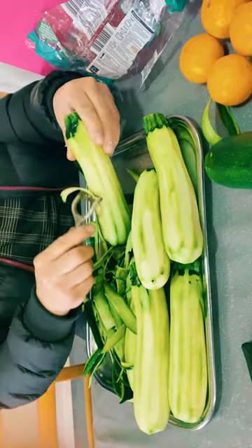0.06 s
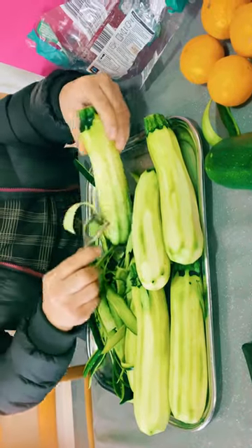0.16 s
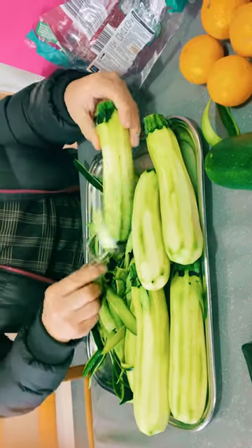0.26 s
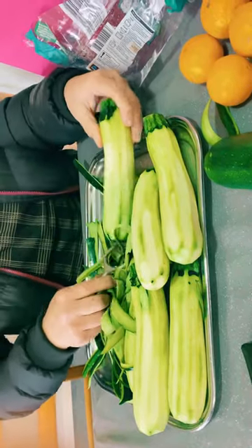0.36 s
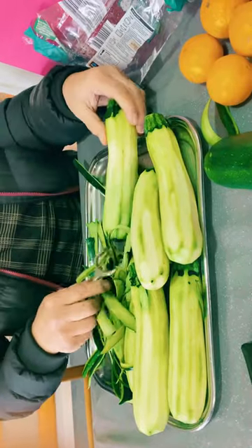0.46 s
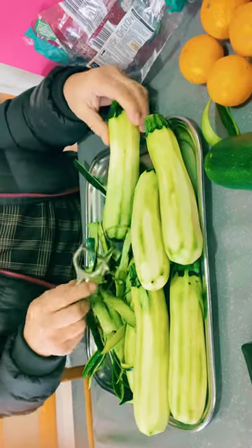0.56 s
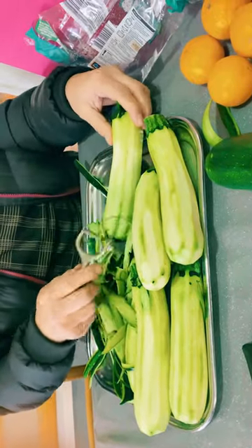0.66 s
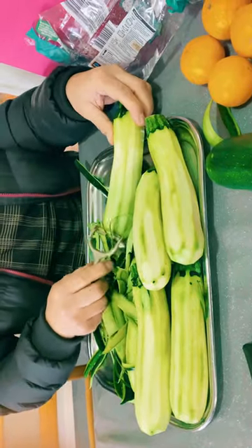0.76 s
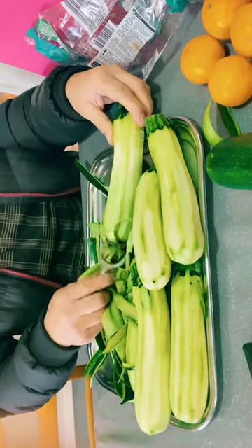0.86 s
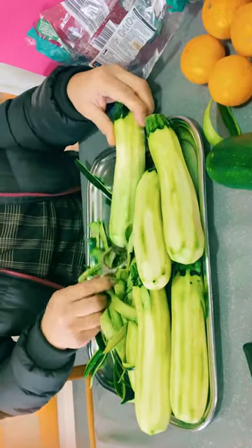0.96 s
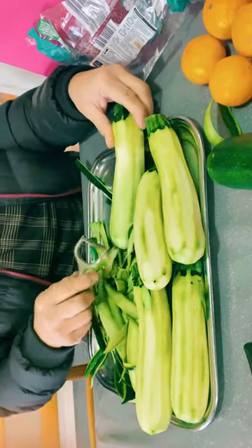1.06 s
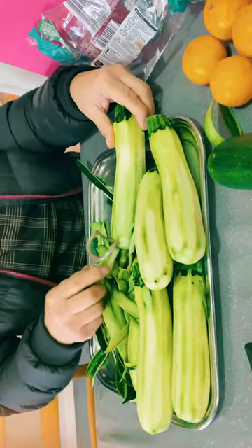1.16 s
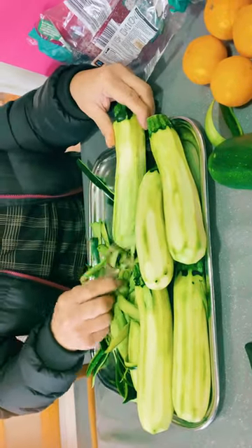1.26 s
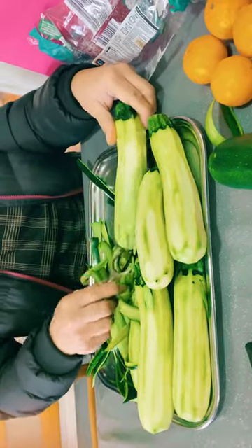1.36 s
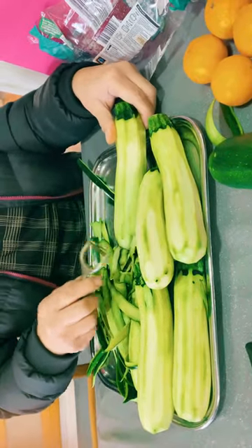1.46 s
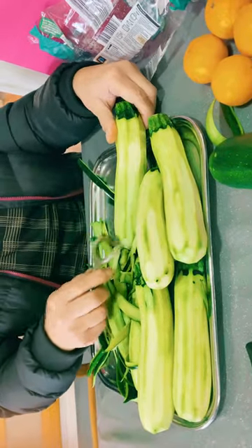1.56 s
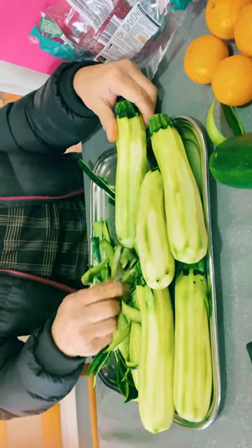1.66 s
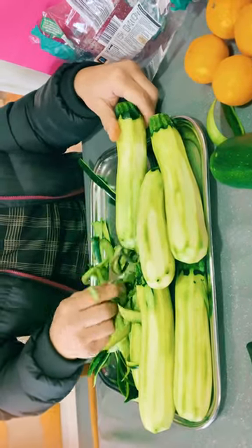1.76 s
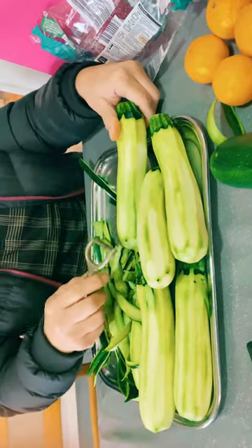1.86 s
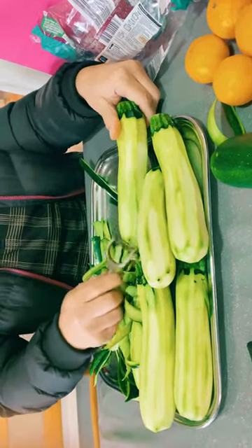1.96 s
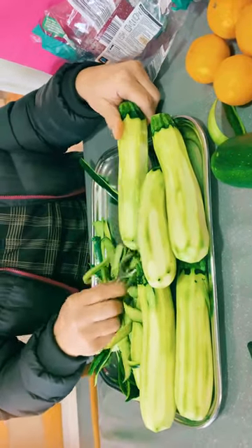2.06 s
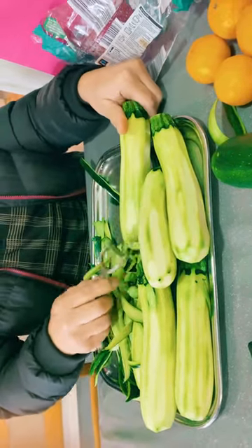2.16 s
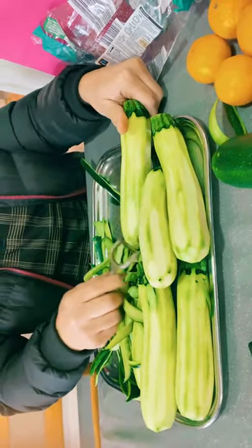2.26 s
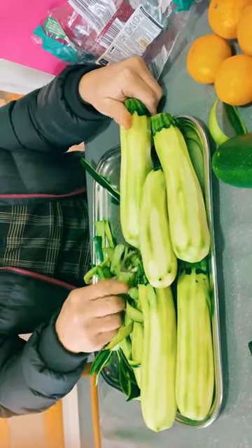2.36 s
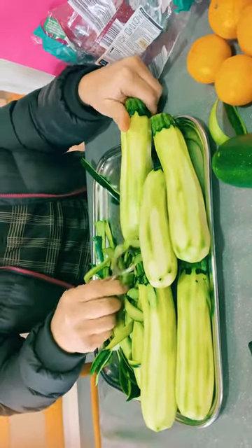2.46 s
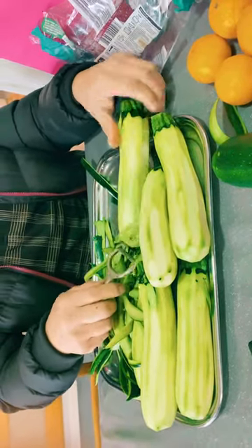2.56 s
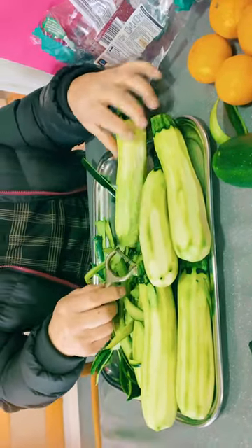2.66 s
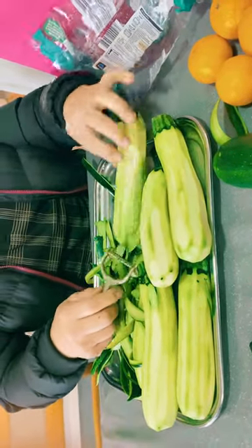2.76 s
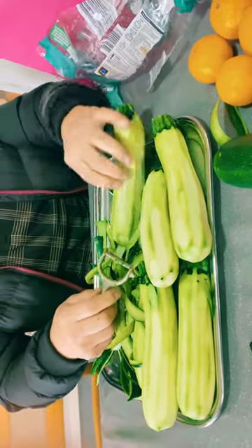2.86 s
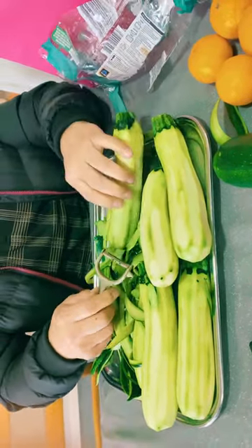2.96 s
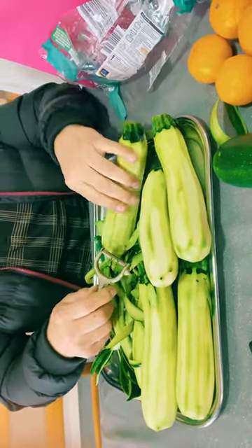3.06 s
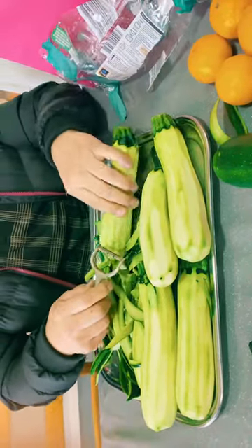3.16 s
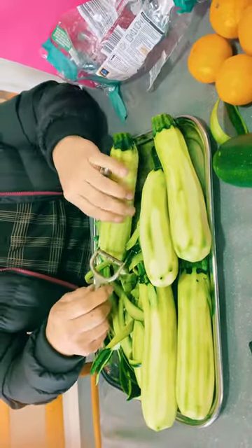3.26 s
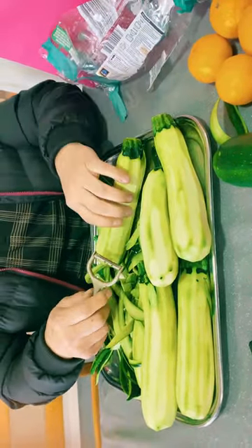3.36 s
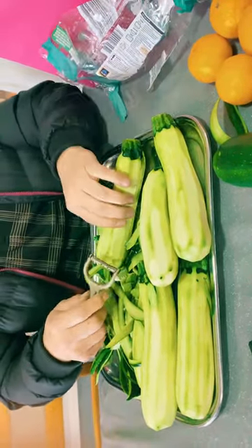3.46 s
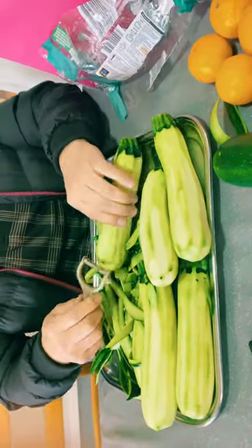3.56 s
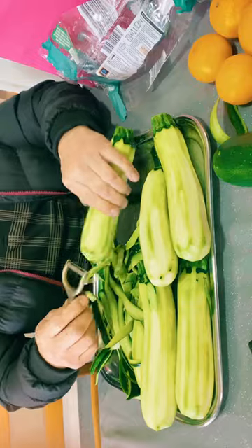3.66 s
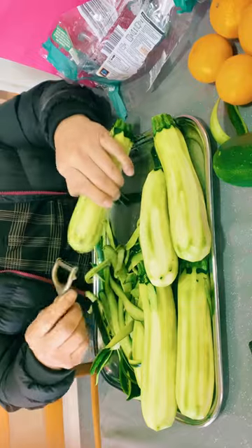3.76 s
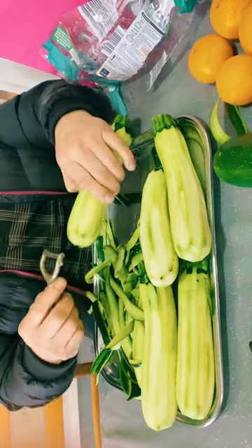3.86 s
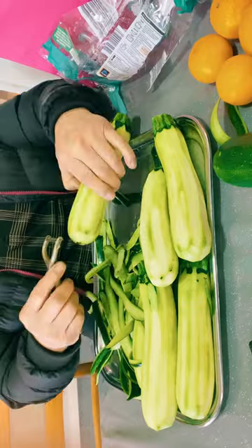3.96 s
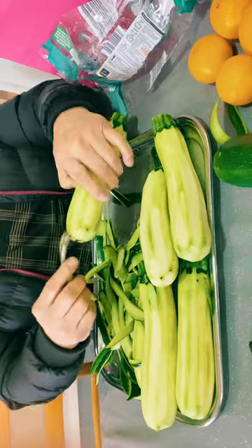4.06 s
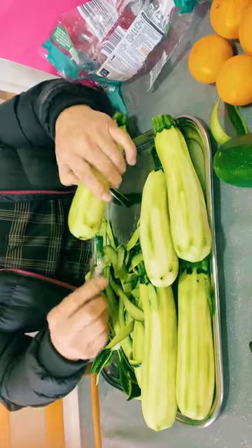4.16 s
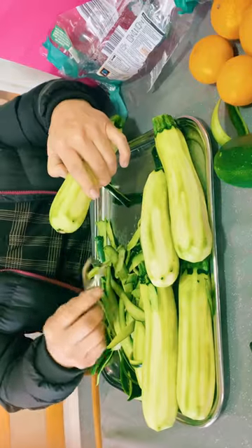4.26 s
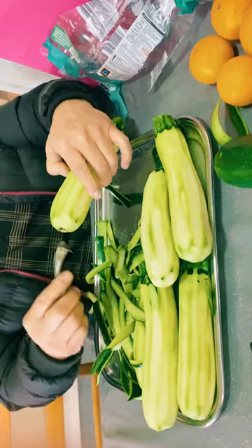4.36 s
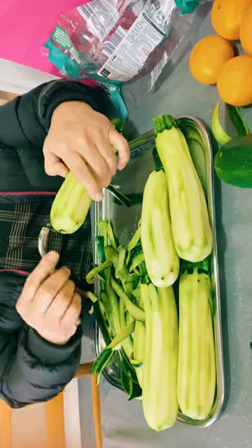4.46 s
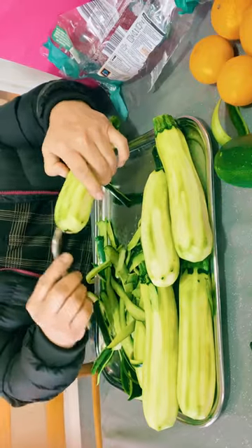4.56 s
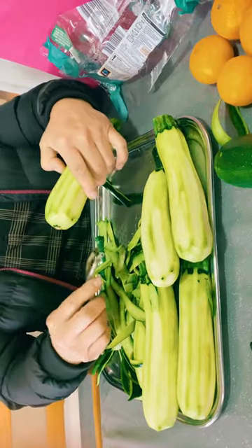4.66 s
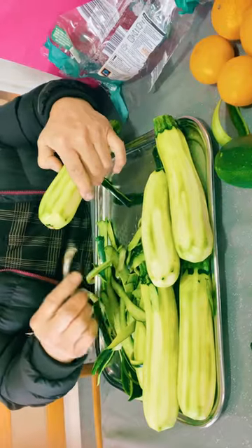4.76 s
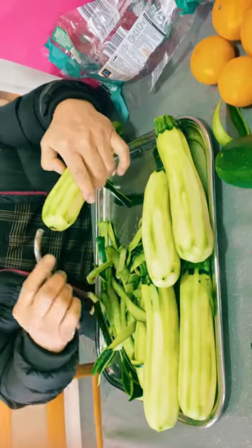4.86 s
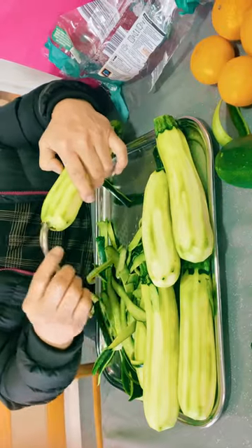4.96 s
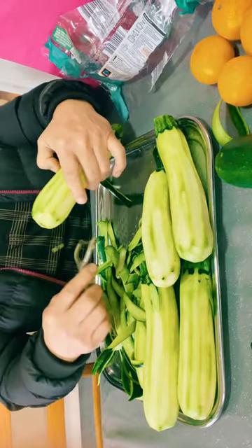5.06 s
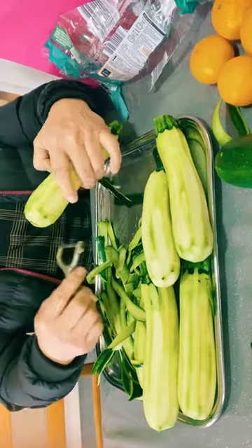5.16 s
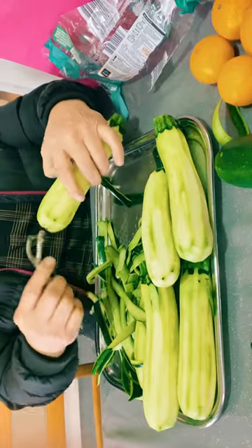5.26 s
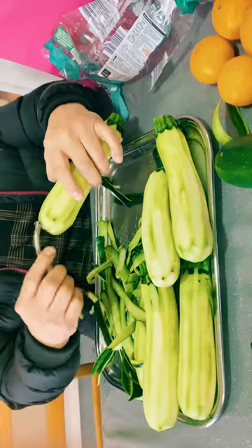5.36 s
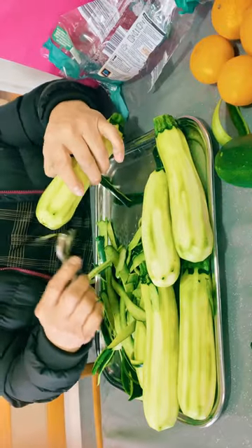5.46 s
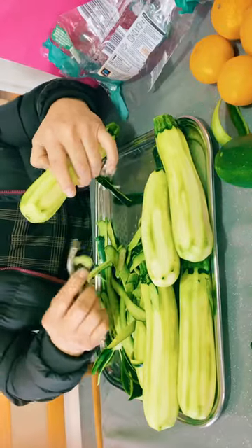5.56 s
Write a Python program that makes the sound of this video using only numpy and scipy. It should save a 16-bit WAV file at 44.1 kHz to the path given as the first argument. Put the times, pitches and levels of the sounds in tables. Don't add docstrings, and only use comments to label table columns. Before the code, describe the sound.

A close stereo pickup in a small, hard kitchen, with faint hiss and a steady low appliance hum. It opens with a soft, fluttering slide of wet skin on steel and sleeve rustle. From about 0.37 s a peeler works over marrows on a metal tray: crisp gritty bites, brief blade rasp, and hard clacks with short tray ring and counter thump near 0.38, 0.9, 1.3, 1.7, 2.05 and 2.3 s, the last cluster among the loudest. Lighter ticks and gliding scrapes fill the gaps, and around 1.6 s a bright snap rings thinly. From 2.5 to 4 s it is nearly quiet: tiny ticks, a hissy cloth flick near 2.85 s, soft low bumps around 3.6 s. From 4.03 s, thin bright snips come in small groups near 4.05, 4.2, 4.5, 4.95, 5.1, 5.4 and 5.55 s, dry and without tray ring, with gentle sleeve swishes between.

```python
import sys
import numpy as np
from scipy import signal
from scipy.fft import rfft, irfft, next_fast_len
from scipy.io import wavfile

SR = 44100
rng = np.random.default_rng(int(sys.argv[2]) if len(sys.argv) > 2 else 0)


def natural_amplitude(level_db):
    exponent = np.asarray(level_db, float) / 20
    return 10 ** exponent


def file_out(sig):
    cols = np.atleast_2d(sig).T
    lim = np.clip(cols, -1, 1)
    pcm = np.round(lim * 32767).astype(np.int16)
    wavfile.write(sys.argv[1], SR, pcm)


N = 247842


def unit(x):
    return x / np.sqrt(np.mean(x ** 2) + 1e-20)


def at_hz(points, hz):
    f, value = np.transpose(points)
    return np.interp(np.log(hz + 1), np.log(f + 1), value)


def drift(rate_hz):
    step = 40
    r = np.exp(-2 * step * np.pi * rate_hz / SR)
    white = rng.standard_normal(N // step + 2002)
    slow = signal.lfilter([1], [1, -2 * r, r * r], white)[2000:]
    return np.interp(np.arange(N) / step, np.arange(len(slow)), unit(slow))


def resonance(x, hz, width, order=1):
    r = np.exp(-np.pi * max(width, 1) / SR)
    peak = [(1 - r * r) / 2, 0, (r * r - 1) / 2, 1, -2 * r * np.cos(2 * np.pi * hz / SR), r * r]
    return signal.sosfilt([peak] * order, x + 1e-18)


def grains(rate_hz, spread_db):
    sizes = natural_amplitude(spread_db * np.minimum(rng.exponential(1, N), 3))
    sizes = sizes * rng.choice([-1, 1], N)
    return unit(sizes * (rng.random(N) < rate_hz / SR))


def struck(body, events, column, gain_db, drive, rise_s, stretch, order=1, hold=1):
    times, level_db, lengths = np.array(events)[:, [0, column, -1]].T
    luck = rng.standard_normal((len(times), len(body)))
    t = np.arange(int(SR * min(0.25, 0.09 * stretch))) / SR
    fade_s = stretch * np.clip(lengths, 0.001, 0.06)[:, None]
    bursts = (1 - np.exp(-t / rise_s)) * np.exp(-(t / fade_s) ** hold)
    starts = (times * SR).astype(int)
    drive = np.r_[drive, drive[:len(t)]]
    shakes = []
    for at, burst in zip(starts, bursts):
        shake = burst * drive[at:at + len(t)]
        shakes.append(shake * np.linalg.norm(burst) / np.linalg.norm(shake))
    out = np.zeros(N)
    for k, (hz, width, db) in enumerate(body):
        force = np.zeros(N + SR)
        gains = natural_amplitude(level_db + gain_db + db + 1.1 * luck[:, k])
        for at, shake, gain in zip(starts, shakes, gains):
            force[at:at + len(t)] += gain * shake
        out += (-1) ** k * resonance(force[:N], hz, width, order)
    return out


def rubbed(body, level_db, drive, flicker_db, flicker_rate):
    total = 0
    for k, (hz, width, db) in enumerate(body):
        flicker = natural_amplitude(db + flicker_db * drift(flicker_rate))
        total = total + flicker * resonance(drive, hz, width) * (-1) ** k
    return natural_amplitude(level_db) * unit(total)


def bands(white, spectrum):
    edges = 25 * 2 ** np.arange(0, 9.6, 0.5)
    for k, (low, high) in enumerate(zip(edges, edges[1:])):
        hz = np.sqrt(low * high)
        band = signal.butter(2, [low, high], "band", fs=SR, output="sos")
        yield hz, natural_amplitude(at_hz(spectrum, hz)) * signal.sosfilt(band, white[k % 2])


# (t/s, blade level/dB, edge
# level/dB, tray level/dB, burst length/s)
KNOCKS = [(0.377, -14, -14, -15, 0.0027), (0.384, -27.5, -36, -27, 0.0029),
          (0.727, -55.5, -37, -34.5, 0.003), (0.893, -33, -29.5, -33, 0.015),
          (0.904, -10.5, -10.5, -10, 0.0031), (0.9157, -20.5, -29, -24.5, 0.0027),
          (1.3054, -17, -13.5, -16.5, 0.0032), (1.312, -28, -27, -20, 0.0034),
          (1.692, -47, -39, -31, 0.0029), (1.693, -25.5, -18.5, -59, 0.002),
          (2.042, -32, -23, -18.5, 0.0017), (2.052, -53, -43, -26.5, 0.003),
          (2.2833, -36.5, -33, -45, 0.0026), (2.295, -49.5, -45.5, -47.5, 0.023),
          (2.321, -15, -12.5, -10.5, 0.0027), (2.322, -13, -30, -21, 0.0026),
          (2.3279, -20, -29.5, -12, 0.0025), (5.0207, -39.5, -36.5, -66, 0.0017),
          (5.035, -60, -48, -75, 0.002), (5.402, -42, -31, -63, 0.00083)]


def knocks():
    drag_db = -16.5
    return [(s, blade, edge, tray, blade + drag_db, length) for s, blade, edge, tray, length in KNOCKS]


# (t/s, blade level/dB, edge level/dB, drag level/dB)
RESTING_BITES = [(0.355, -50, -60, -68), (0.365, -32.5, -28.5, -48), (0.565, -59.5, -59.5, -73),
                 (0.7198, -27, -23, -38.5), (1.025, -41, -34, -68), (1.119, -41, -46.5, -56.5),
                 (1.1932, -32, -24, -47.5), (1.196, -32.5, -30.5, -51), (1.277, -44.5, -47, -72),
                 (1.524, -42.5, -44, -61), (1.574, -48, -57, -63), (1.5972, -23.5, -16, -103.5),
                 (1.6065, -36.5, -28, -59.5), (1.613, -50, -39.5, -41.5), (1.7874, -38.5, -31, -55),
                 (1.908, -49, -51, -92), (1.954, -30, -31, -50), (2.029, -36.5, -39, -62),
                 (2.131, -46.5, -41.5, -55), (2.243, -48.5, -49, -77.5), (2.492, -66, -48, -53),
                 (2.551, -56, -76, -79), (2.744, -73, -53, -93), (2.757, -70.5, -63.5, -89),
                 (2.77, -72.5, -58, -90), (2.796, -69, -49.5, -88)]
# (t/s, blade level/dB, edge level/dB, drag level/dB)
HELD_BITES = [(4.033, -32, -23.5, -51), (4.048, -28, -25.5, -47.5), (4.055, -30, -24.5, -50.5),
              (4.168, -53, -54, -78), (4.2065, -39, -27, -51.5), (4.5078, -32.5, -36.5, -57),
              (4.518, -42, -44, -64), (4.5262, -30.5, -34.5, -51), (4.624, -45.5, -47, -53.5),
              (4.662, -42, -31.5, -57), (4.918, -51, -54.5, -71), (4.9475, -33, -33, -56.5),
              (4.9555, -36, -50, -54), (5.025, -56, -57, -56.5), (5.091, -35.5, -32.5, -54),
              (5.312, -58, -60.5, -77.5), (5.3715, -30.5, -30, -49), (5.389, -27.5, -29, -54),
              (5.394, -34, -25, -47), (5.489, -43, -49, -66), (5.5515, -38, -35, -58)]


def bites():
    firm_s, firm_db, soft_stretch = 0.0051, -38, 0.13
    repeat_s, repeat_db = 0.0079, -13
    rows = []
    for table, passed_db in ((RESTING_BITES, -16.5), (HELD_BITES, -29)):
        for s, blade, edge, drag in table:
            length = firm_s * natural_amplitude(soft_stretch * (firm_db - max(blade, edge)))
            bite = np.array([blade, edge, blade + passed_db])
            rows.append((s, *bite, drag, length))
            rows.append((s + repeat_s, *(bite + repeat_db), drag, length))
    return rows


# (f/Hz, width/Hz, level/dB)
BLADE = [(2540, 660, -8.5), (3570, 130, -15.5), (4476, 1300, -3), (4572, 260, 4), (5164, 300, -3.5),
         (6390, 1100, -6), (7960, 690, -5.5), (7155, 230, -1.5)]
EDGE = [(7800, 1400, -11), (9780, 140, 5), (9806, 86, 5), (10110, 1700, -2), (11440, 500, -2),
        (12500, 350, 5), (14200, 390, 2.5), (15400, 1200, -7)]
# (f/Hz, width/Hz, level/dB)
GRIPPED = [(2270, 820, -1), (3980, 2200, -3.5), (5540, 1100, -3), (8000, 910, -3)]
GRIPPED_EDGE = [(9630, 1200, 0), (11100, 1200, -1), (12500, 2100, 0), (14200, 870, 0)]


def peeler(fractures, glide_db):
    bitten, knocked = bites(), knocks()
    out = struck(BLADE, bitten, column=1, gain_db=11.5, drive=fractures, rise_s=0.00078, stretch=0.85, order=2)
    out += struck(EDGE, bitten, column=2, gain_db=18.0, drive=fractures, rise_s=0.00093, stretch=0.45, order=2)
    out += struck(GRIPPED, knocked, column=1, gain_db=13.0, drive=fractures,
                  rise_s=0.00061, stretch=0.92, order=2)
    out += struck(GRIPPED_EDGE, knocked, column=2, gain_db=12.5, drive=fractures,
                  rise_s=0.0004, stretch=0.45, order=2)
    skin = grains(4000, spread_db=4.0) * natural_amplitude(2.5 * drift(56))
    out += struck(BLADE + EDGE, knocked + bitten, column=4, gain_db=0.5, drive=skin,
                  rise_s=0.002, stretch=9.9, order=2)
    glide = grains(7000, spread_db=-2.5)
    return out + rubbed(BLADE + EDGE, glide_db - 6.0, glide, flicker_db=4.0, flicker_rate=43)


# (t/s, dull level/dB, bright level/dB)
SNAPS = [(0.377, -23, -14), (0.3795, -13.5, -27), (0.7204, -42, -31), (0.9037, -16, -8), (0.906, -9, -15),
         (1.1948, -37, -20), (1.1968, -39, -28), (1.3075, -6.5, -9), (1.3087, -7, -9), (1.3098, -13, -11),
         (1.5986, -28.5, -17), (1.5995, -26, -20), (1.696, -29.5, -14.5), (1.955, -34.5, -35.5),
         (2.046, -25, -33), (2.3217, -8.5, -8), (2.3233, -6.5, -22), (2.325, -8.5, -19), (4.0356, -41, -22),
         (4.0517, -43, -26), (4.0573, -33.5, -21), (4.2097, -36.5, -31), (4.5083, -40.5, -30),
         (4.5281, -30.5, -19), (4.537, -37, -37), (4.9512, -39, -41), (4.958, -31, -36.5),
         (5.092, -40, -39), (5.3977, -29, -21), (5.5535, -43.5, -27)]
# (f/Hz, width/Hz, level/dB)
SNAP_DULL = [(1900, 2000, 0.041), (3280, 3300, -2.6)]
SNAP_BRIGHT = [(7300, 1400, -2), (9900, 2000, 0), (12600, 2500, -1)]
# (f/Hz, width/Hz, level/dB)
SHEET = [(574, 35, -2.5), (648.6, 25, -4), (708, 16, 2), (773, 14, 1), (880, 22, -0.5), (1060, 17, 1),
         (1167, 30, -3.5), (1418, 35, -5), (1612, 35, -3), (1791, 40, -5), (1998, 34, 0.5), (2234, 45, 0),
         (2600, 70, -1.5), (2900, 80, -4.5)]


def snaps():
    s, dull_db, bright_db = np.transpose(SNAPS)
    luck = rng.standard_normal((len(s), len(SHEET)))
    lifted_db = -60 * (s > 3)
    strikes = [(mode, dull_db + 7.0) for mode in SNAP_DULL]
    strikes += [(mode, bright_db + 7.5) for mode in SNAP_BRIGHT]
    strikes += [(mode, dull_db + 20.5 + 2.5 * luck[:, k] + lifted_db) for k, mode in enumerate(SHEET)]
    out = np.zeros(N)
    for (hz, width, db), level_db in strikes:
        clicks = np.zeros(N)
        clicks[(s * SR).astype(int)] = natural_amplitude(level_db + db)
        out += resonance(clicks, hz, width)
    return out


# (t/s, f/Hz, level/dB,
# width/Hz)
RINGS = [(0.7198, 9600, -39, 39.7), (0.912, 6300, -29.5, 300), (1.308, 4650, -26.5, 290),
         (1.31, 1400, -31.5, 270), (1.599, 5900, -30, 60), (2.33, 5500, -31, 350), (4.047, 4670, -33.5, 99),
         (4.527, 7400, -33.5, 54), (4.3, 2570, -49, 55), (5.093, 2580, -45, 49.8), (5.389, 5180, -29, 93),
         (5.372, 8900, -30.5, 81), (4.034, 9800, -32, 133), (1.6, 7700, -32, 400),
         (1.606, 14000, -25.5, 300)]


def singing(fractures):
    out = 0
    for s, hz, db, width in RINGS:
        blow = [(s, db, 0.012)]
        out = out + struck([(hz, width, 0)], blow, column=1, gain_db=21.0, drive=fractures,
                           rise_s=0.00048, stretch=0.74)
    return out


# (f/Hz, width/Hz, level/dB)
TRAY_FLOOR = [(369, 260, -12), (534, 156, -2), (620, 170, -1), (724, 120, -1.5), (866.6, 85, 2.5),
              (955, 210, 1), (1073, 110, 2), (1221, 81, -7.5)]
TRAY_RIM = [(1350, 160, -1), (1765, 520, -1.5), (2290, 290, 6.5), (2350, 360, 4.5), (2730, 950, -4),
            (3230, 860, -5), (4405, 890, -7), (5330, 690, -7), (6100, 760, -9.5), (7500, 950, -24.5)]
# (f/Hz, width/Hz, level/dB)
LOADED_FLOOR = [(543, 130, 0.5), (700, 260, -2), (846, 180, -6)]
# (t/s, level/dB)
BOOMS = [
    (0.378, -34),
    (0.906, -28),
    (1.31, -25),
    (1.694, -41),
    (2.045, -34),
    (2.284, -50),
    (2.322, -20),
]


def tray(fractures):
    rows = np.array(knocks() + bites())
    times, lengths = rows[:, 0], rows[:, -1]
    hard_db = np.minimum(rows[:, 1], rows[:, 3])
    floor = struck(TRAY_FLOOR, rows, column=3, gain_db=12.0, drive=fractures, rise_s=0.00022, stretch=0.94)
    rim = struck(TRAY_RIM, np.c_[times, hard_db, lengths], column=1, gain_db=17.5, drive=fractures,
                 rise_s=0.0036, stretch=1.194)
    steady = np.c_[times, hard_db, np.full(len(rows), 0.005)]
    shiver = struck(TRAY_FLOOR + TRAY_RIM, steady, column=1, gain_db=-7.0, drive=fractures[::-1],
                    rise_s=0.0029, stretch=8.7)
    booms = [(s, db, 0.021) for s, db in BOOMS]
    boom = struck(LOADED_FLOOR, booms, column=1, gain_db=6, drive=fractures[::-1],
                  rise_s=0.004, stretch=2.5, order=2)
    return floor + rim + shiver + boom


# (f/Hz, width/Hz, level/dB)
SLIDE = [(1055, 130, 5), (2100, 99, 3.5), (746, 100, -8.5)]


def slide():
    middle_s, length_s, level_db = 0.14, 0.19, -52.5
    swell = np.exp(-(2.0 * (np.arange(N) / SR - middle_s) / length_s) ** 2)
    return swell * rubbed(SLIDE, level_db, grains(2500, spread_db=-2.5), flicker_db=3.5, flicker_rate=41)


# (t/s, deep level/dB, hum level/dB, upper level/dB)
THUMPS = [(0.136, -73, -50, -61), (0.199, -71, -47, -61.5), (0.369, -45.5, -44, -42),
          (0.734, -39, -38, -51), (0.8, -53, -52.5, -68), (0.904, -55, -36.5, -38.5),
          (1.201, -51, -44.5, -52), (1.307, -50, -27.5, -42), (1.604, -42, -44.5, -51.5),
          (1.689, -60.5, -33.5, -44), (1.956, -43, -40.5, -50), (2.039, -50, -41, -43.5),
          (2.29, -71, -37, -47), (2.314, -44, -29.5, -36.5), (2.69, -59, -72, -62), (3.074, -63, -70, -73),
          (3.358, -55.5, -64.5, -77.5), (3.571, -54.5, -50, -64.5), (3.61, -63.5, -51.5, -72),
          (3.644, -65.5, -53, -75), (4.04, -85.5, -68.5, -64.5), (4.167, -83, -55, -67),
          (4.512, -78, -60, -63), (4.958, -79, -49.5, -56), (5.378, -64, -56, -68.5)]


def pushes():
    return [(s, deep, hum, upper, 0.051 * natural_amplitude(0.06 * (deep - hum))) for s, deep, hum, upper in THUMPS]


# (f/Hz, width/Hz, level/dB)
COUNTER_DEEP = [(45, 21, 2.5), (62.5, 8.1, 9.5), (87, 52, -3)]
COUNTER_HUM = [(93, 31, -12), (123, 20, 3.5), (152, 39, -6.5)]
COUNTER_UPPER = [(183.8, 10, 3), (218, 51, -2), (253.7, 24, 2), (351, 120, -12.5), (425, 41, -14.5)]


def counter(rumble_db):
    shove = 1 + 0.9 * rng.standard_normal(N)
    hold = 2.3
    thumps = pushes()
    deep = struck(COUNTER_DEEP, thumps, column=1, gain_db=23.0, drive=shove,
                  rise_s=0.012, stretch=0.94, hold=hold)
    hum = struck(COUNTER_HUM, thumps, column=2, gain_db=26.5, drive=shove,
                 rise_s=0.0034, stretch=1.1, hold=hold)
    upper = struck(COUNTER_UPPER, thumps, column=3, gain_db=26.5, drive=shove,
                   rise_s=0.00018, stretch=1.49, hold=hold)
    murmur = rubbed(COUNTER_DEEP + COUNTER_HUM, rumble_db - 6.5, rng.standard_normal(N),
                    flicker_db=2.5, flicker_rate=4)
    building = rubbed([(44, 11, 0)], -80, rng.standard_normal(N), flicker_db=1.5, flicker_rate=2.1)
    band = signal.butter(2, [58, 500], "band", fs=SR, output="sos")
    return signal.sosfilt(band, deep + hum + upper) + murmur + drone() + building


# (f/Hz, width/Hz, level/dB)
SLEEVE = [(696, 270, -6), (1000, 180, -2.5), (1400, 1000, -3), (2170, 240, -2), (2700, 400, -13.5)]


def sleeve(rustle_db):
    return rubbed(SLEEVE, rustle_db - 3.5, rng.standard_normal(N), flicker_db=2.5, flicker_rate=12)


# (middle t/s, sleeve level/dB, fine hiss level/dB, length/s)
SWISHES = [
    (2.764, -78, -58.5, 0.086),
    (2.854, -63.5, -51, 0.11),
    (3.413, -67, -74, 0.14),
    (4.17, -59.5, -61.5, 0.062),
    (4.596, -65, -57, 0.15),
    (5.038, -64.5, -59.5, 0.13),
    (5.456, -65.5, -56.5, 0.16),
]
# (f/Hz, width/Hz, level/dB)
CLOTH = [(505, 1070, -2.5), (1200, 1600, 1), (2520, 570, 2)]
# (f/Hz, width/Hz, level/dB)
HISS = [(4700, 4900, -3), (7160, 2100, -5), (10830, 1200, 4)]


def swishes():
    t = np.arange(N) / SR
    swells = np.array([np.exp(-(2.3 * (t - s) / length) ** 2) for s, _, _, length in SWISHES])
    _, rub_db, hiss_db, _ = np.transpose(SWISHES)
    rub = rubbed(CLOTH, 0, grains(4700, spread_db=7.0), flicker_db=0.0, flicker_rate=39.5)
    hiss = rubbed(HISS, 0, rng.standard_normal(N), flicker_db=1.5, flicker_rate=24)
    return natural_amplitude(rub_db) @ swells * rub + natural_amplitude(hiss_db) @ swells * hiss


# (f/Hz, time/s)
ROOM_FADE = [(100, 0.89), (260, 0.35), (700, 0.31), (1840, 0.24), (4850, 0.23), (12800, 0.062)]
# (f/Hz, level/dB)
ROOM_COLOUR = [(100, -16), (300, 5), (700, 4), (2000, 3), (5000, 1), (9000, 5.5), (14000, -11)]


def kitchen(x):
    wall_s, wall_spread_s, wall_gain = 0.0086, 0.0011, 2.2
    t = np.arange(SR // 2) / SR
    white = rng.standard_normal((2, 2, len(t)))
    tail = sum(band * natural_amplitude(-60 * t / at_hz(ROOM_FADE, hz)) for hz, band in bands(white, ROOM_COLOUR))
    build_up = np.clip((t - 0.002) / 0.0012, 0, 1)
    wall = 1 + wall_gain * np.exp(-((t - wall_s) / wall_spread_s) ** 2)
    tail = tail * build_up * wall
    tail = tail / np.sqrt(np.mean(np.sum(tail ** 2, axis=1)))
    return signal.fftconvolve(x[None], tail, axes=1)[:, :N]


# (f/Hz, phase/radians)
LEFT_PHASE = [(0, 0), (750, 1.3), (1400, -2.3), (2750, -2), (3450, 0.5), (5300, 1.9), (6800, -0.1),
              (8270, -3.6), (8960, -5.1), (10300, -6.25), (11700, -9.1), (12700, -10.6), (13800, -12.5),
              (14600, -12.8), (15850, -15.7)]
# (f/Hz, level/dB)
LEFT_BALANCE = [(60, 7), (110, -8.5), (200, 0.5), (380, 3.5), (700, 5.5), (1290, 5), (2380, -0.5),
                (4400, 2.5), (8120, 2.5), (15000, -0.5)]


def turned_left(x):
    size = next_fast_len(N + 4096)
    hz = np.arange(size // 2 + 1) * SR / size
    turn = natural_amplitude(at_hz(LEFT_BALANCE, hz)) * np.exp(1j * at_hz(LEFT_PHASE, hz))
    left = irfft(rfft(x, size) * turn, size)[:N]
    return np.array([left, x])


def split(x):
    own = signal.butter(4, 7000, "low", fs=SR, output="sos")
    shared = signal.butter(4, 7000, "high", fs=SR, output="sos")
    return signal.sosfilt(own, x) + turned_left(signal.sosfilt(shared, x[1]))


def drone():
    level_db, sway_db = -66, 0.9
    pitch_hz = 126.8 + 1.1 * drift(5)
    phase = 2 * np.pi * np.cumsum(pitch_hz) / SR
    return natural_amplitude(level_db + sway_db * drift(3)) * np.sqrt(2) * np.sin(phase)


# (f/Hz, level/dB per Hz)
AIR = [(88, -28.5), (150, -7), (179, -15), (481, -23.5), (800, -26.5), (1750, -12), (2500, -30.5),
       (4390, -25.5), (5230, -29), (6730, -17.5), (7410, -30.5), (10500, -28), (12300, -45.5), (15500, -52)]
# (f/Hz, likeness)
AIR_LIKENESS = [(60, 0.41), (130, 0.92), (290, 0.61), (640, -1.6), (1400, -0.3), (3100, 0.12), (7000, 0)]
# (f/Hz, width/Hz, gain)
WHINES = [(1466, 4.3, 1.3), (4470, 14, 1.5)]


def still_air():
    out = 0
    for hz, (mid, side) in bands(rng.standard_normal((2, 2, N)), AIR):
        alike = np.clip(at_hz(AIR_LIKENESS, hz), -1, 1)
        out = out + np.sqrt(1 + alike) * mid + np.sqrt(1 - alike) * side * [[1], [-1]]
    peaks = 2.0 * resonance(out, 4330, 600, order=2) + 1.3 * resonance(out, 6720, 550, order=2)
    out = out + peaks - 0.6 * resonance(out, 2350, 410)
    out = out + sum(gain * resonance(out, hz, width) for hz, width, gain in WHINES)
    treble = signal.sosfilt(signal.butter(2, 300, "high", fs=SR, output="sos"), out)
    return out * natural_amplitude(-66.5) / np.std(treble)


# (t/s, blade pressure level/dB, arm movement level/dB)
HANDS = [(0.0, -50, -56.5), (0.19, -46.5, -55), (0.34, -65, -61.5), (0.75, -63.5, -68), (1.0, -43, -49),
         (1.2, -71, -65), (1.36, -51.5, -43.5), (1.61, -76.5, -78), (1.74, -39, -56.5), (1.86, -70, -77),
         (2.07, -36, -55.5), (2.19, -66.5, -88.5), (2.44, -52, -45.5), (2.6, -61, -60),
         (2.88, -63.5, -59.5), (3.08, -76.5, -71), (3.5, -68.5, -74.5), (5.62, -79, -80)]


def scene():
    s, pressure_db, movement_db = np.transpose(HANDS)
    t = np.arange(N) / SR
    glide_db = np.interp(t, s, pressure_db)
    rustle_db = np.interp(t, s, movement_db)
    rumble_db = -59.5 + 0.18 * (rustle_db + 63)
    fractures = grains(9000, spread_db=3.0)
    near = peeler(fractures, glide_db) + snaps() + singing(fractures)
    near += tray(fractures) + slide() + sleeve(rustle_db) + swishes()
    low = counter(rumble_db)
    echoes = kitchen(natural_amplitude(-7.0) * near + natural_amplitude(-10.5) * low)
    return turned_left(near) + low * natural_amplitude([[0.6], [-0.6]]) + split(echoes + still_air())


def roll_off(x):
    return signal.sosfilt(signal.butter(12, 16490, fs=SR, output="sos"), x)


# (f/Hz, level/dB)
OUTPUT_COLOUR = [(100, 2), (8000, 0.5), (11300, -4), (11900, -1), (13000, -6.5), (14500, -7.5), (15600, -8.5),
                 (16400, -1)]


def record(dry):
    hz = np.linspace(0, SR / 2, 65)
    colour = signal.firwin2(255, hz, natural_amplitude(2 * at_hz(OUTPUT_COLOUR, hz)), fs=SR)
    heard = signal.lfilter(signal.minimum_phase(colour), 1, dry)
    rounded = 1.1 * np.tanh(heard / 1.1)
    top_cut = signal.cheby2(10, 60, 16500, fs=SR, output="sos")
    mix = signal.sosfilt(top_cut, rounded)
    return roll_off(mix)


dry = scene()
out = record(dry)
file_out(out)
```